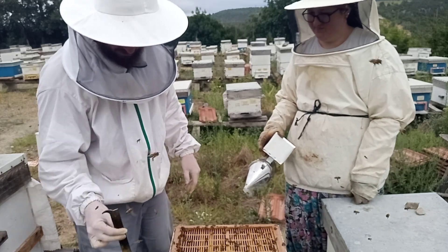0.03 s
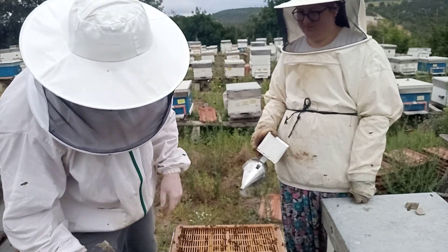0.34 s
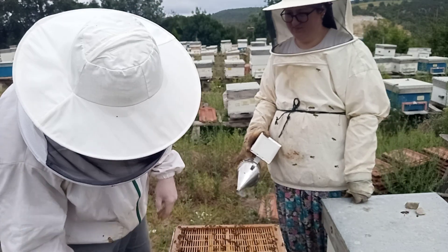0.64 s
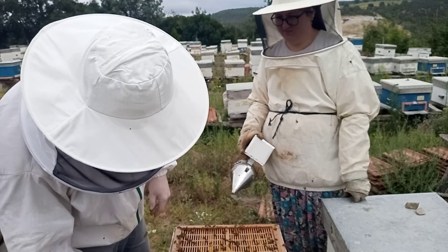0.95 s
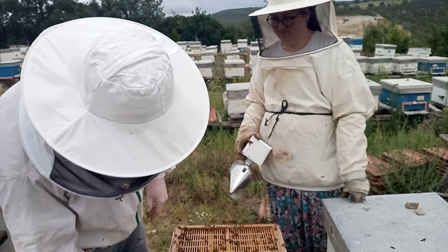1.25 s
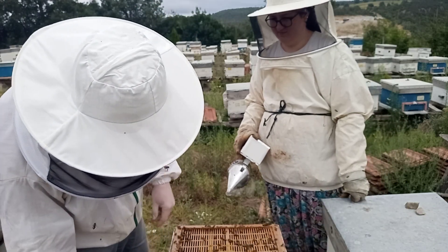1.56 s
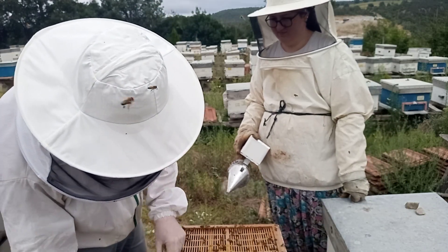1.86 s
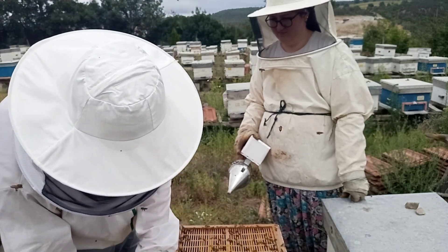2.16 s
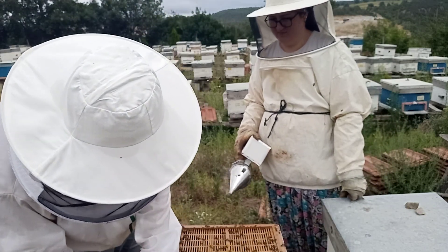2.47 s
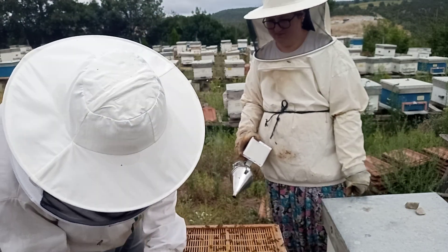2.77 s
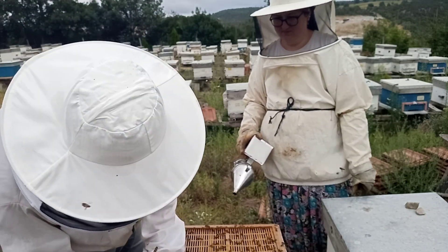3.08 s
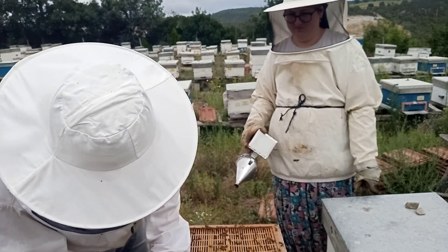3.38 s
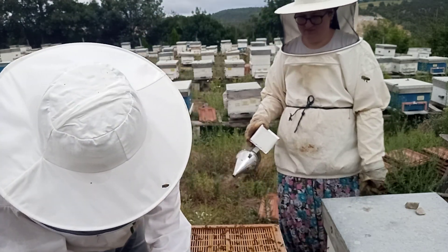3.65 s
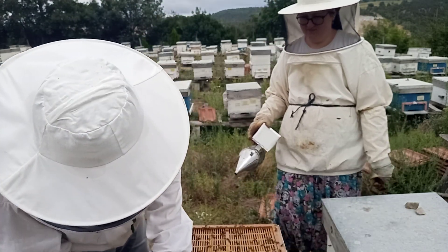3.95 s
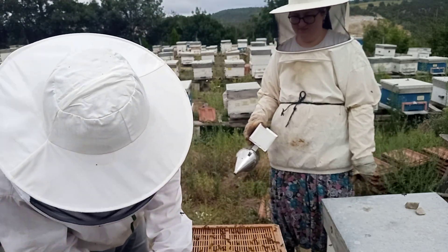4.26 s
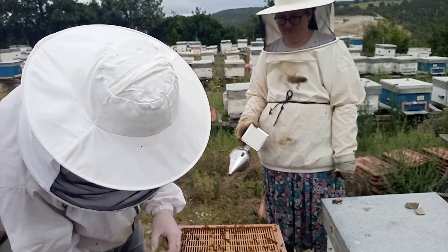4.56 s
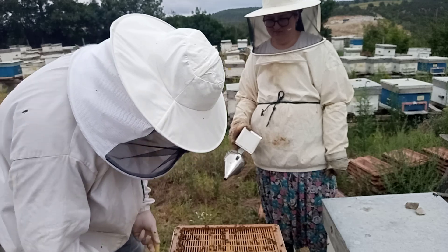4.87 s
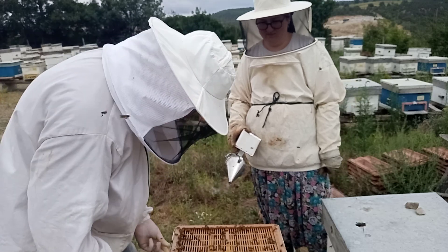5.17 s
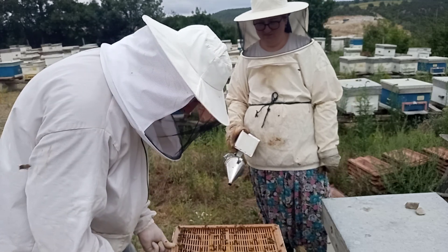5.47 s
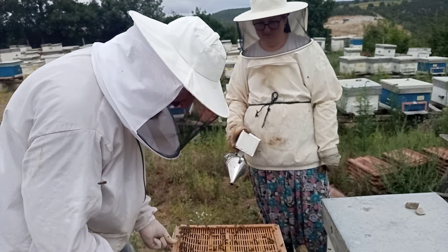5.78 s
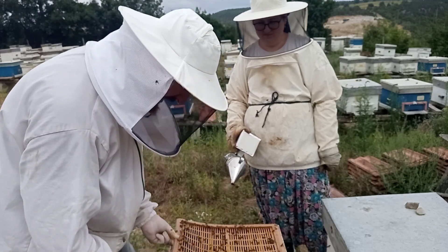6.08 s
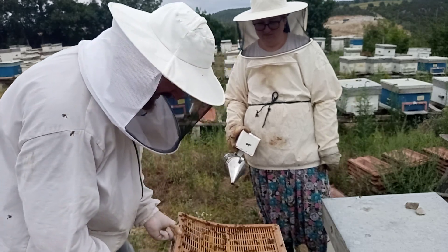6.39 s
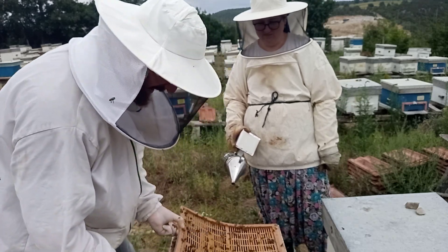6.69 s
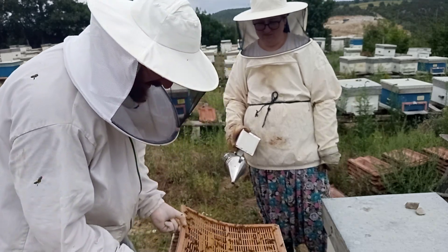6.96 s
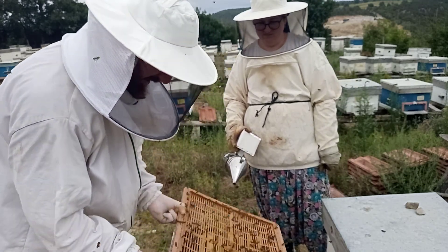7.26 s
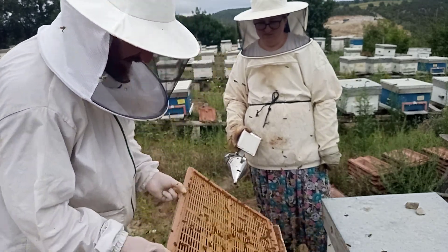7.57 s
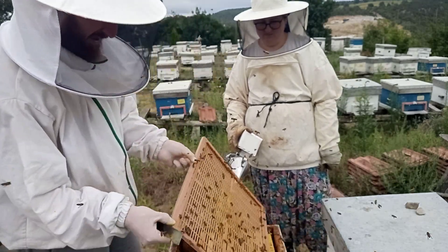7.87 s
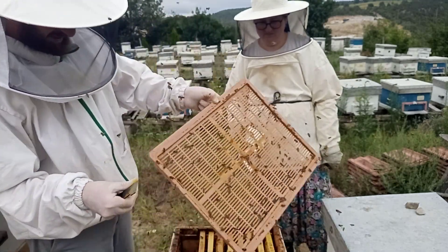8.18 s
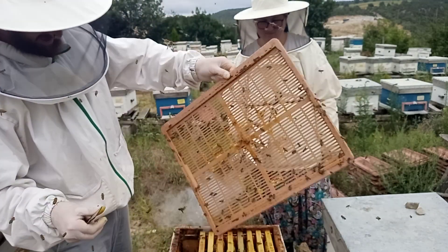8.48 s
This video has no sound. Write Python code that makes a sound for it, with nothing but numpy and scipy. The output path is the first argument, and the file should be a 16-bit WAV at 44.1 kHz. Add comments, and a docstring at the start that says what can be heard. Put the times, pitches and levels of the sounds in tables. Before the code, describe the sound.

Honey bees hum around an open hive while a steel tool prises a plastic grid loose with sharp snaps and knocks.

```python
"""Honey bees hum over an open hive, a pulse for every wingbeat, while light wind buffets the microphone.
After a second a steel hive tool starts to prise a plastic grid (the queen excluder) off the wooden box.
Its seal of propolis, the bees' resin glue, snaps again and again, and jolts stir the bees. Near 3 and 4
seconds a bee darts past; near 3 and 6 a far bird whistles. Just after 7 seconds the grid tears free
with a crackle and knocks on the box, and the hum turns into the broader buzz of bees in flight."""
import sys
import numpy as np
from scipy import signal
from scipy.fft import rfft, irfft, next_fast_len
from scipy.io import wavfile
from scipy.ndimage import map_coordinates

SR = 44100
rng = np.random.default_rng(int(sys.argv[2]) if len(sys.argv) > 2 else 0)


def unload_audio(sound):
    """Save the sound as a 16-bit wav file, at the path given as the first command line argument."""
    columns = np.transpose(np.atleast_2d(sound))
    # keep every value between -1 and 1, then stretch to whole-number steps
    steps = np.round(np.clip(columns, -1, 1) * 32767)
    wavfile.write(sys.argv[1], SR, steps.astype(np.int16))


N = 376326
TIME = np.arange(N) / SR

# Bees that hover nearer for a while. Each row: time when closest in seconds, boost from nearness in dB,
# half the stay in seconds, pitch of the strongest overtones in Hz, wingbeat in Hz.
BEE_VISITS = [(2.41, 3.5, .14, 2370, 240), (4.65, 2, 0.58, 2510, 248), (5.76, 0.5, .1, 2950, 245.3),
              (6.1, 3.5, .22, 2600, 240.8), (6.72, 5, .11, 2290, 227), (6.99, 4.5, .09, 2330, 232.8),
              (7.92, 5, .14, 2000, 238), (8.42, 6.5, 0.078, 3310, 237.6)]
# The wooden box's own tones. Each row: pitch in Hz, level in dB, seconds to fade by 60 dB.
BOX_TONES = [(190, -6, 0.11), (255.7, -5, 0.075), (394.4, 3.5, 0.058), (580, 3.5, 0.025), (755, 9, 0.033)]
# Tugs that tear the grid free of wax and resin. Each row: start in seconds, level in dB,
# fade in seconds, then the fizz and the grid's ring, both in dB relative to that level.
TUGS = [(7.314, -40.5, 0.0038, -17, -2), (7.3283, -36, 0.0055, -11.5, -2), (7.351, -30, 0.0088, -15, -13),
        (7.3663, -35, 0.0015, -26, -2), (7.3759, -31.5, 0.00096, -22, -0.5)]


def undb(db):
    """Turn decibels into a factor to multiply by."""
    return 10 ** (np.asarray(db) / 20)


def unit(x):
    """Scale a sound to an average (rms) size of 1."""
    return x / np.sqrt(np.mean(x ** 2) + 1e-20)


def unit_hit(x):
    """Give a short sound the energy of a size-1 sound that lasts a hundredth of a second."""
    return x / np.sqrt(np.sum(x ** 2) / (SR / 100))


def gain_at(hz, points):
    """Read gains off a curve of (Hz, dB) points; they fall away below the first point."""
    point_hz, db = np.transpose(points)
    hz = np.maximum(hz, 1)
    return undb(np.interp(np.log(hz), np.log(point_hz), db)) * np.minimum(hz / point_hz[0], 1) ** 2


def colour(x, points):
    """Shape a sound's bass and treble with a curve of (Hz, dB) points."""
    size = next_fast_len(len(x) + 4096)
    gains = gain_at(np.fft.rfftfreq(size, 1 / SR), points)
    cepstrum = irfft(np.log(gains + 1e-5), size)
    # folding it in half makes the filter ring only after a sound, never before
    cepstrum[1:size // 2] *= 2
    cepstrum[size // 2 + 1:] = 0
    return irfft(rfft(x, size) * np.exp(rfft(cepstrum)), size)[:len(x)]


def drift(t, rate):
    """A smooth random wobble of size near 1 that turns about rate times a second."""
    return map_coordinates(rng.standard_normal(2048), [t * rate], order=2, mode="wrap")


def add(out, start_s, x):
    """Mix x into out from start_s on."""
    i = max(int(start_s * SR), 0)
    out[i:i + len(x)] += x[:max(N - i, 0)]


def bump(middle_s, half_s):
    """A smooth rise to 1 at middle_s and back down."""
    return np.exp(-((TIME - middle_s) / half_s) ** 2)


def crackle(per_s, spread_db):
    """Random ticks of uneven size that come in bunches."""
    bunches = undb(3 * drift(TIME, 45))
    hits = rng.random(N) < per_s / SR
    return hits * undb(spread_db * np.clip(rng.standard_normal(N), -2, 2)) * bunches


def air(level_db=-59):
    """The steady hush of the open field."""
    # The tone of the hush. Each row: frequency in Hz, level in dB.
    hush_colour = [(25, -13.5), (60, -13.5), (130, -14), (220, -0.5), (330, -9), (1000, -1.5), (2000, -10),
                   (4500, -33), (9000, -37.5), (12500, -43.5), (15500, -43)]
    return unit(colour(rng.standard_normal(N), hush_colour)) * undb(level_db)


def wind(calm_db=-76, gust_edge_s=0.048, thump_hz=104.2, thump_half_s=0.009):
    """Air swirls at the microphone: spells of restless rumble with single soft thumps."""
    # Spells of wind. Each row: start in seconds, end in seconds, level in dB.
    gusts = [(.25, .78, -75.5), (2.74, 3.08, -67.5), (4.237, 5.28, -63.5), (5.797, 6.793, -53.5),
             (7.032, 7.528, -50), (7.683, 7.855, -51), (7.98, 8.5, -71)]
    # The strongest swirls, heard as thumps. Each row: middle in seconds, level in dB.
    thumps = [(3.038, -53.5), (4.278, -46), (4.4, -47), (4.696, -54), (4.797, -45), (4.839, -48.5),
              (4.932, -43), (5.231, -58), (5.813, -44), (6.207, -36.5), (6.43, -41.5), (6.608, -31.5),
              (6.722, -41.5), (7.115, -37.5), (7.218, -39), (7.44, -43), (7.51, -46), (7.742, -41.5),
              (8.034, -48.5)]
    rumble_colour = [(35, -10), (70, 8), (120, 1.5), (160, -5.5), (220, -2.5), (330, -24),
                     (500, -7.5), (1500, -67.5)]
    rumble = unit(colour(rng.standard_normal(N), rumble_colour))
    spells = sum(undb(db) * np.clip(np.minimum(TIME - start, end - TIME) / gust_edge_s + .5, 0, 1)
                 for start, end, db in gusts)
    out = rumble * (undb(calm_db) + spells) * undb(3 * drift(TIME, 16))
    t = np.arange(SR // 4) / SR
    swell = 1 / np.cosh((t - t[-1] / 2) / thump_half_s)
    for s, db in thumps:
        pitch = thump_hz * np.exp(0.416 * drift(t, 329))
        phase = 2 * np.pi * (np.cumsum(pitch) / SR + rng.random())
        tone = unit(np.sin(phase) + undb(-17) * np.sin(2 * phase))
        add(out, s - t[-1] / 2, undb(db) * tone * swell)
    return out


def bird(droop=0.015):
    """A far bird whistles pure, slightly falling notes."""
    # Thin whistles. Each row: start in seconds, pitch in Hz, level in dB, length in seconds.
    whistles = [(3.196, 3970, -67.5, 0.057), (6.204, 3940, -74, 0.078)]
    out = np.zeros(N)
    for s, hz, db, length_s in whistles:
        along = np.linspace(0, 1, int(length_s * SR))
        phase = 2 * np.pi * np.cumsum(hz * (1 - droop * (along - .5))) / SR
        add(out, s, undb(db) * np.sin(np.pi * along) * np.sin(phase))
    return out


def clothes(still_db=-88):
    """The keeper's stiff cotton crackles faintly all the time and more with each movement."""
    # Sleeves and veil move. Each row: middle in seconds, level in dB, half the length in seconds.
    rustles = [(1.0, -81, 0.12), (3.137, -79, .07), (4.58, -80.5, 0.086), (8.028, -79, .15)]
    # The tone of the cloth. Each row: frequency in Hz, level in dB.
    cloth_colour = [(3000, -3), (4500, -25), (5500, 6), (6500, 6), (8000, -9), (13000, -14), (15500, -7.5)]
    creases = crackle(per_s=2000, spread_db=4)
    motion = sum(undb(db) * bump(s, half_s) for s, db, half_s in rustles)
    return unit(colour(creases, cloth_colour)) * (undb(still_db) + motion)


def shimmer(x, depth_db, rate, width_hz):
    """Groups of neighbouring overtones swell and fade at random, making the buzz shimmer."""
    hz, t, frames = signal.stft(x, SR, nperseg=1024)
    where = np.meshgrid(hz / width_hz, t * rate, indexing="ij")
    swell = map_coordinates(rng.standard_normal((256, 256)), where, order=2, mode="wrap")
    return unit(signal.istft(frames * undb(depth_db * swell), SR)[1][:N])


def stir(rise_s=0.033, settle_s=0.23):
    """How upset the bees are, 0 at rest: it jumps at each jolt and settles again."""
    # Jolts to the hive. Each row: start in seconds, strength from 0 to 1.
    jolts = [(1.29, 0.28), (2.24, 0.5), (5.56, 0.52), (7.36, 0.66)]
    out = np.zeros(N)
    for s, strength in jolts:
        age = np.maximum(TIME - s, 0)
        out += strength * (1 - np.exp(-age / rise_s)) * np.exp(-age / settle_s)
    return out


def startled_hiss(gain_db=-57):
    """A hard jolt makes the colony hiss and rustle until it settles."""
    # The tone of the hiss. Each row: frequency in Hz, level in dB.
    hiss_colour = [(1500, 0), (3200, 0), (4200, -14), (5500, -8), (6600, -7), (8500, -17), (12000, -24)]
    rustle = rng.standard_normal(N) * undb(3 * drift(TIME, 230))
    hiss = shimmer(colour(rustle, hiss_colour), depth_db=2, rate=35, width_hz=500)
    return hiss * stir() ** 2.8 * undb(gain_db)


def wingbeats(count, wing_hz, spread, wander, flutter, range_db, turn_rate):
    """One pulse per wingbeat of many bees, each veering in pitch and in distance."""
    out, t = np.zeros(N + 2), TIME[::64]
    for rank in rng.permutation(np.linspace(-1, 1, count)):
        own_offset = spread * np.sqrt(3) * rank
        hz = wing_hz * np.exp(own_offset + wander * drift(t, turn_rate) + flutter * drift(t, 35))
        cycles = np.cumsum(hz) * t[1] + rng.random()
        beat_times = np.interp(np.arange(2, int(cycles[-1])), cycles, t)
        size = undb(range_db * np.clip(drift(beat_times, turn_rate), -2, 2))
        # each pulse is shared between the two nearest samples
        whole, part = np.divmod(beat_times * SR, 1)
        out[whole.astype(int)] += size * (1 - part)
        out[whole.astype(int) + 1] += size * part
    return unit(out[:N])


def swarm(hum_db=-49, rasp_db=-67.5, lift_start_s=7.36, lift_s=0.16, uncovered_boost_db=2.5):
    """The crowd hums and the nearest wing tips rasp; both grow when the bees are stirred."""
    # The tone of the hum, the rasp and the bees taking off. Each row: frequency in Hz, level in dB.
    hum_colour = [(150, -10.5), (250, -15.5), (320, -15.5), (410, 4), (520, 4.5), (610, -3.5), (730, -2),
                  (1000, 1), (1300, 0), (1600, -5), (2000, -25), (3000, -50)]
    rasp_colour = [(1200, -5), (2000, 5.5), (2800, 5.5), (3600, -1.5), (4400, -29), (5500, -11.5),
                   (6000, -16.5), (6600, -8.5), (8000, -25), (12000, -55)]
    flight_colour = [(150, -11.5), (230, -8.5), (310, -9), (400, 4), (520, 6.5), (620, -2), (800, 1),
                     (1000, 4), (1300, 0.5), (1650, -3.5), (2000, -15.5), (3000, -45.5)]
    near = wingbeats(5, wing_hz=254, spread=.025, wander=.05, flutter=.009, range_db=4, turn_rate=7)
    crowd = wingbeats(24, wing_hz=242, spread=.075, wander=.055, flutter=.009, range_db=4.5, turn_rate=5)
    hum = shimmer(colour(crowd + .6 * near, hum_colour), depth_db=2.3, rate=14, width_hz=150)
    rasp = shimmer(colour(near + .45 * crowd, rasp_colour), depth_db=3.8, rate=17, width_hz=190)
    flyers = wingbeats(12, wing_hz=233, spread=.1, wander=.055, flutter=.008, range_db=5, turn_rate=8)
    flight = shimmer(colour(flyers, flight_colour), depth_db=2.3, rate=14, width_hz=150)
    # as the grid lifts, the hum gives way to the broader buzz of bees in flight
    lifted = np.clip((TIME - lift_start_s) / lift_s, 0, 1)
    buzz = np.sqrt(1 - lifted) * hum + np.sqrt(lifted) * flight
    upset = stir()
    nearness_db = sum(db * bump(s, half_s) for s, db, half_s, _, _ in BEE_VISITS)
    buzz *= undb(hum_db + 5.5 * upset)
    rasp *= undb(rasp_db + 16 * upset + 0.5 * nearness_db)
    return undb(uncovered_boost_db * lifted) * (buzz + rasp)


def bee_tone(pitch, sizes):
    """The clean tone of one bee: overtones of the given sizes at multiples of its wingbeat."""
    phase = 2 * np.pi * np.cumsum(pitch) / SR
    orders = np.arange(1, len(sizes) + 1)[:, None]
    return unit(sizes @ np.sin(orders * phase + 2 * np.pi * rng.random(orders.shape)))


def hovering_bees(gain_db=-53.5, glide=.018, favour_db=8, favour_width_hz=220):
    """Single bees come near and glide down in pitch; each one's heading favours some overtones."""
    # The tone of one close bee. Each row: frequency in Hz, level in dB.
    bee_colour = [(250, -6), (500, -1.5), (1100, -1.5), (1700, -7), (2400, -12), (3300, -21), (4400, -38)]
    out = np.zeros(N)
    for s, db, half_s, favoured_hz, wing_hz in BEE_VISITS:
        t = np.arange(int(4 * half_s * SR)) / SR
        along = t / half_s - 2
        pitch = wing_hz * (1 - glide * np.tanh(along) + .014 * drift(t, 22) + .007 * drift(t, 130))
        overtone_hz = wing_hz * np.arange(1, 17)
        favour = undb(favour_db * np.exp(-((overtone_hz - favoured_hz) / favour_width_hz) ** 2))
        swell = (undb(db * np.exp(-along ** 2)) - 1) * undb(2 * drift(t, 19))
        add(out, s - 2 * half_s, swell * bee_tone(pitch, gain_at(overtone_hz, bee_colour) * favour))
    return shimmer(out + 1e-9, depth_db=3.5, rate=22, width_hz=230) * np.std(out) * undb(gain_db)


def darting_bees(doppler=0.01375, waver=0.0062, lopsided=0.23):
    """A passing bee swells fast and fades a little more slowly, and its pitch drops as it goes by."""
    # Passes by the microphone. Each row: time when closest in seconds, wingbeat in Hz, level in dB,
    # half the passing time in seconds.
    passes = [(3.174, 254, -34.5, 0.019), (4.167, 235, -49, 0.015)]
    # The tone of a passing bee. Each row: frequency in Hz, level in dB.
    pass_colour = [(250, 8), (505, 13), (760, 3.5), (1020, -1), (1500, -8.5), (2000, -34), (2600, -13.5),
                   (4500, -42)]
    out, t = np.zeros(N), np.arange(int(.8 * SR)) / SR
    for s, wing_hz, db, half_s in passes:
        along = (t - t[-1] / 2) / half_s
        pitch = wing_hz * (1 - doppler * along / np.hypot(1, along) + waver * drift(t, 51.4))
        tone = bee_tone(pitch, gain_at(np.arange(1, 31) * wing_hz, pass_colour))
        away = along * (1 - lopsided * np.sign(along))
        add(out, s - t[-1] / 2, tone * undb(db) / (1 + away ** 2 / 2) ** 2.5)
    return out


def light_touches():
    """Tool and fingers click on the grid, each touch a short scratch around one pitch."""
    # Small clicks. Each row: start in seconds, pitch in Hz, level in dB, fade in seconds.
    clicks = [(.11, 1700, -54, .004), (1.232, 9900, -69.5, .005), (6.016, 3080, -62, .003),
              (6.082, 3430, -65, .003), (6.339, 6760, -75, .004)]
    out, t = np.zeros(N), np.arange(SR // 10) / SR
    for s, hz, db, fade_s in clicks:
        scratch = rng.standard_normal(len(t)) * np.exp(-t / fade_s)
        peak = signal.iirpeak(hz, Q=5, fs=SR)
        click = signal.lfilter(*peak, signal.lfilter(*peak, scratch))
        add(out, s, undb(db) * unit_hit(click))
    return out


def peeling_wax(level_db=-56):
    """The sticky grid goes on peeling as it lifts: fine ticks of wax that swell and fade."""
    wax_colour = [(900, 11.5), (2500, 2), (3500, -2), (4500, -15), (6500, -9), (10000, -23),
                  (12500, -27), (15000, -19)]
    grit = unit(colour(crackle(per_s=4500, spread_db=3), wax_colour))
    return grit * bump(middle_s=7.52, half_s=0.19) * undb(level_db)


def tearing_threads(low_hz=4500):
    """With each tug hundreds of tiny threads part in a bright, gritty fizz."""
    out, t = np.zeros(N), np.arange(SR // 10) / SR
    bright = signal.butter(2, low_hz, "high", fs=SR, output="sos")
    for s, db, fade_s, fizz_db, _ in TUGS:
        threads = rng.standard_normal(len(t)) ** 3 * np.exp(-t / fade_s)  # cubing makes noise spiky
        add(out, s, undb(db + fizz_db) * unit_hit(signal.sosfilt(bright, threads)))
    return out


def ring(tones, t, scatter_db=1.5, detune=.025):
    """A struck object's fading tones, new with each blow; most start in step, giving a sharp pulse."""
    hz, db, fade_s = np.transpose(tones)
    size_luck, pitch_luck, sign_luck = rng.standard_normal((3, len(hz)))
    sizes = undb(db + scatter_db * size_luck) * np.sign(sign_luck + 1)
    poles = 2j * np.pi * hz * (1 + detune * pitch_luck) - np.log(1000) / fade_s
    fading_sines = np.exp(poles[:, None] * t).imag
    # little sound leaves the object outside the range of its tones
    band = signal.butter(3, [.82 * hz.min(), 1.02 * hz.max()], "band", fs=SR, output="sos")
    return signal.sosfilt(band, sizes @ fading_sines)


def snap(db, centre_hz, slip_s, thud_db, crack_db, grid_db, focus_db=9, blade_fade_s=.017):
    """A break and a quick run of smaller slips ring the blade, then the grid, and thump the box."""
    # The steel blade's own tones, each a pitch in Hz; the hand damps them all alike.
    blade_pitches = [1746, 1950, 2145, 2340, 2550, 2733, 2990, 3300, 3620]
    # The plastic grid's own tones. Each row: pitch in Hz, level in dB, seconds to fade by 60 dB.
    grid_tones = [(840, -10.5, 0.058), (934, 1, 0.072), (1082, 8, 0.019), (1170, -5, 0.022),
                  (1411, 8, .024), (1570, -8, 0.0068)]
    # The bright crack of the brittle resin. Each row: frequency in Hz, level in dB.
    crack_colour = [(1500, -17), (3500, 10), (4400, -6), (5500, 1), (7000, -8.5), (9000, -12.5),
                    (12000, -21)]
    t = np.arange(SR // 6) / SR
    slips = rng.standard_normal(len(t)) ** 3 * np.exp(-t / slip_s)
    force = 0.99 * np.sqrt(slip_s / 0.0011) * slips / np.linalg.norm(slips)
    force[0] = 1  # the break itself
    # the spot where the blade presses favours the tones near one pitch
    blade_tones = [(hz, -focus_db * np.log2(hz / centre_hz) ** 2, blade_fade_s) for hz in blade_pitches]
    # the heavier parts answer a little after the blade
    parts = (BOX_TONES, thud_db, .0013), (grid_tones, db + grid_db, .00077), (blade_tones, db, 0)
    ringing = np.zeros(len(t))
    for tones, level_db, lag_s in parts:
        answer = signal.fftconvolve(force, ring(tones, np.maximum(t - lag_s, 0)))[:len(t)]
        ringing += undb(level_db) * unit_hit(answer)
    burst = rng.standard_normal(len(t)) * np.exp(-t / (slip_s + .002))
    crack = unit_hit(colour(force + burst / np.linalg.norm(burst), crack_colour))
    return ringing + undb(db + crack_db) * crack


def hive_tool(break_db=-3.5, bounce_s=.0032, focus_db=7, echo_db=-21, echo_s=.22):
    """Prising snaps the seal and the blade bounces; the grid knocks on the box and is tugged off."""
    # Snaps of the seal. Each row: start in seconds, base level in dB, the blade's favoured pitch in Hz,
    # slip time in seconds, base level of the box's thud in dB, then three offsets in dB: for the
    # resin's crack, the grid's ring and the bounce.
    snaps = [(1.2846, -33.5, 2600, 0.0014, -70, -7, -6.5, -2.5),
             (1.302, -29, 2040, 0.00056, -55, -24, -6.5, -1),
             (1.534, -26.5, 2720, 0.0013, -51.5, -8, -2.5, -5), (2.053, -50, 1880, .025, -58, -34, 2, -4),
             (2.2273, -32.5, 3220, 0.001, -60, -9, -7, -5),
             (2.2296, -32.5, 2700, 0.0012, -56, -8.5, 3.5, -9),
             (2.9912, -36, 3220, 0.0017, -47, -8, 0, -0.5),
             (5.5525, -26, 2400, 0.00064, -44, -15, -4, -7.5),
             (5.9035, -40.5, 3300, 0.0013, -66, -13, -9, -7.5),
             (6.5492, -42.5, 3750, 0.00071, -40, -1, 2, -9.5),
             (6.609, -52.5, 2470, 0.0013, -36.5, -5, 9, -5.5),
             (7.2945, -29, 3000, 0.0003, -56, -14, -10, -18),
             (7.3018, -33.5, 2200, 0.0013, -37, -11, 3.5, -5.5),
             (7.3607, -27, 2600, 0.00053, -30.5, -5.5, -4, -26)]
    # Dull knocks of the grid on the box. Each row: start in seconds, level in dB, favoured pitch in Hz,
    # a factor on how long the box rings.
    knocks = [(2.236, -44.5, 430, 2), (3.001, -37.5, 310, 1.9), (3.695, -50.5, 600, .8),
              (5.555, -37, 337, 0.99), (6.552, -31.5, 553, 2.1), (7.317, -33, 400, 1.1),
              (7.334, -32, 430, 0.69), (7.379, -31, 503, 1.2), (7.392, -40, 300, 2.4), (7.418, -44, 290, 2),
              (7.466, -48, 700, .9)]
    out, t = np.zeros(N), np.arange(SR // 6) / SR
    for s, db, hz, slip_s, thud_db, crack_db, grid_db, bounce_db in snaps:
        add(out, s, snap(db + break_db, hz, slip_s, thud_db + break_db, crack_db, grid_db))
        # a moment later the blade lands again, on a duller spot
        bounce = snap(db + bounce_db, 0.76 * hz, slip_s, thud_db + bounce_db, crack_db - 4, grid_db)
        add(out, s + bounce_s, bounce)
    for s, db, fade_s, _, grid_db in TUGS:
        tug = snap(db, centre_hz=2700, slip_s=fade_s, thud_db=db - 4, crack_db=-11, grid_db=grid_db)
        add(out, s, tug)
    for s, db, centre_hz, sustain in knocks:
        box = [(hz, level_db - focus_db * np.log2(hz / centre_hz) ** 2, fade_s * sustain)
               for hz, level_db, fade_s in BOX_TONES]
        add(out, s, undb(db) * unit_hit(ring(box, t)))
    # the ground and the neighbouring hives scatter a faint echo
    tail = rng.standard_normal(len(t)) * np.exp(-np.log(1000) * t / echo_s)
    return out + undb(echo_db) * signal.fftconvolve(out, tail / np.linalg.norm(tail))[:N]


def scene():
    """The bees, the keeper's work and the open field, all at one microphone."""
    buzzing = swarm() + hovering_bees() + darting_bees()
    keeper = hive_tool() + tearing_threads() + light_touches() + peeling_wax() + clothes()
    return (buzzing + keeper + startled_hiss() + bird() + wind() + air())[None]


def record(dry, low_hz=42, top_hz=15900):
    """The phone cuts the deepest rumble and the highest treble."""
    thin = signal.sosfilt(signal.butter(4, low_hz, "high", fs=SR, output="sos"), dry)
    return signal.sosfilt(signal.ellip(8, .2, 70, top_hz, fs=SR, output="sos"), thin)


dry = scene()
out = record(dry)
unload_audio(out)
```